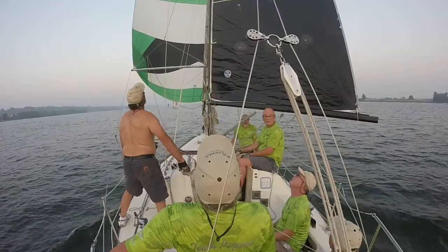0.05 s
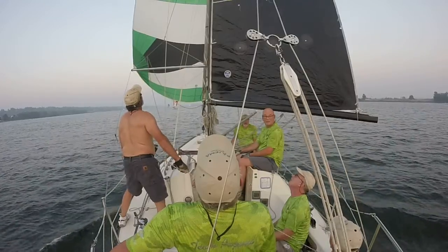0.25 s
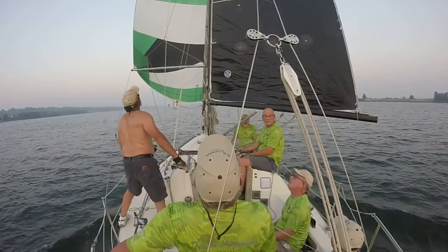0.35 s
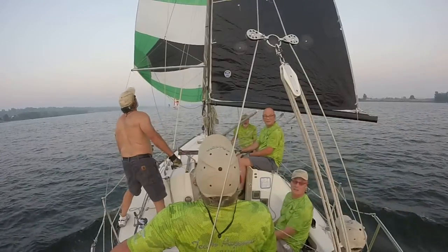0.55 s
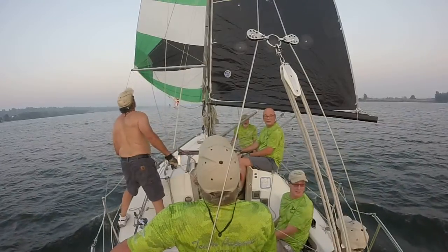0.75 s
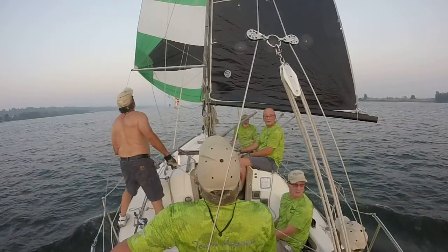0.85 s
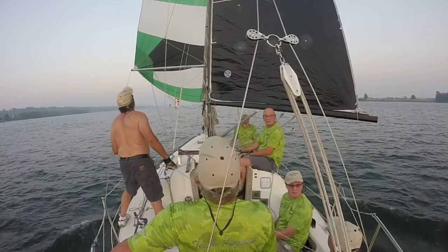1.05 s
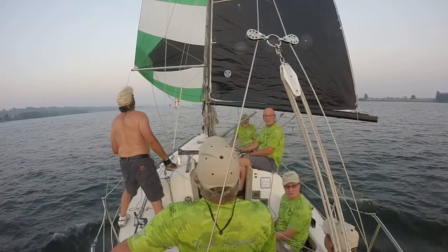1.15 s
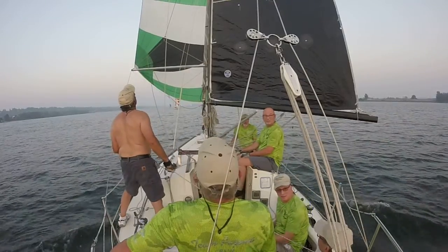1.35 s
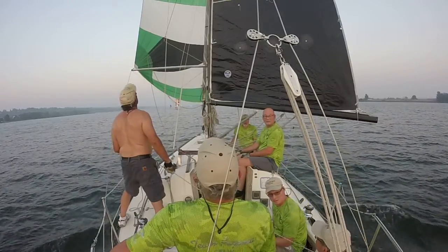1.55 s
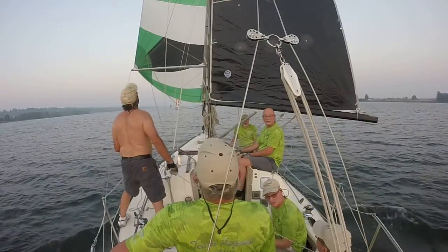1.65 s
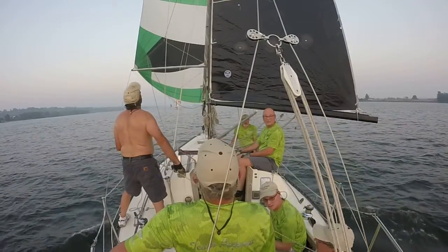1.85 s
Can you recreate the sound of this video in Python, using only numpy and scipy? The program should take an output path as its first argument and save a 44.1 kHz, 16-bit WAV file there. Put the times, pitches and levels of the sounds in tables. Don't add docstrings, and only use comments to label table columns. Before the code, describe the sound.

Sailboat line jerks through a block with a grinding rattle, then knocks loosely as water fizzes

```python
import sys
import numpy as np
from scipy import signal
from scipy.io import wavfile

SR = 44100
rng = np.random.default_rng(int(sys.argv[2]) if len(sys.argv) > 2 else 0)


def dump(signal):
    limited = np.clip(np.atleast_2d(signal).T, -1, 1)
    pcm = np.round(limited * 32767).astype(np.int16)
    wavfile.write(sys.argv[1], SR, pcm)


def convert_level_to_amplitude(level_db):
    exponent = np.asarray(level_db, float) / 20
    return 10 ** exponent


N = 83790


def rms_one(x):
    return x / np.sqrt(np.mean(x ** 2) + 1e-20)


def in_time(rows):
    seconds, *columns = np.transpose(rows)
    return [np.interp(np.arange(N) / SR, seconds, column) for column in columns]


def drift(rate):
    pole = np.exp(-80 * np.pi * rate / SR)
    noise = rng.standard_normal(N // 40 + 2002)
    slow = signal.lfilter([1], [1, -2 * pole, pole * pole], noise)[2000:]
    return np.interp(np.arange(N) / 40, np.arange(len(slow)), rms_one(slow - slow.mean()))


def resonance(x, hz, width_hz):
    r = np.exp(-np.pi * width_hz / SR)
    feedback = [1, -2 * r * np.cos(2 * np.pi * hz / SR), r * r]
    return signal.lfilter([(1 - r * r) / 2, 0, (r * r - 1) / 2], feedback, x + 1e-18)


def bright(x, low_hz, high_hz):
    return signal.sosfilt(signal.butter(2, [low_hz, high_hz], "band", fs=SR, output="sos"), x)


def body(x, modes):
    norm = np.sqrt(sum(convert_level_to_amplitude(2 * db) * np.pi * width / SR for hz, width, db in modes))
    rung = 0
    for k, (hz, width, db) in enumerate(modes):
        rung = rung + (-1) ** k * convert_level_to_amplitude(db) * resonance(x, hz, width)
    lowpass = signal.butter(6, 1.13 * modes[-1][0], fs=SR, output="sos")
    return signal.sosfilt(lowpass, rung / norm)


def grains(rate, spread_db):
    size = convert_level_to_amplitude(spread_db * np.minimum(rng.exponential(1, N), 4)) * rng.choice([-1, 1], N)
    return size * (rng.random(N) < rate / SR)


# frequency in Hz, width in Hz, level in dB.
DEEP_MODES = [(185, 96, -15), (288, 83, -14), (432, 120, -12), (530.6, 41.4, -0.5), (678, 30, -2.5)]
LOW_MODES = [(763, 82, -2.5), (936, 38, 3), (1058, 90, -1.5), (1320, 200, -3.5), (1428, 190, -6)]
MID_MODES = [(1736, 104, 3), (2290, 74, 2), (2430, 183, -7), (2610, 74, -3), (3050, 315, -9.5),
             (3853, 39, -13), (4260, 270, -36)]
HIGH_MODES = [(4890, 120, -36), (5150, 120, 9), (5440, 380, -6.5), (6000, 220, -14)]
# start in seconds, rubbing level in dB, thin ring of the fitting in dB.
HAUL_PULL = [
    (0.2, -48.5, -60.5),
    (0.34, -36.5, -46),
    (0.45, -29, -38),
    (0.65, -24.5, -36.5),
    (0.85, -27.5, -39.5),
    (0.95, -36, -47.5),
    (1.1, -57, -65),
]


def rubbing():
    low_db, ring_db = in_time([(0, -80, -90), *HAUL_PULL, (1.2, -80, -90)])
    rub = rms_one(grains(500, 1)) * convert_level_to_amplitude(-drift(41))
    fine = rms_one(grains(500, 1)) * convert_level_to_amplitude(2.2 * drift(35)) + 0.5 * rub
    thin = body(fine, MID_MODES) + convert_level_to_amplitude(-15.5) * body(fine, HIGH_MODES)
    full = body(rub, LOW_MODES) - convert_level_to_amplitude(-4) * body(rub, DEEP_MODES)
    return convert_level_to_amplitude(low_db - 0.5) * full + convert_level_to_amplitude(ring_db + 0.5) * thin


# start in seconds, peak level
# in dB, then the deep, mid and high rings in dB relative to that peak.
LINE_JOLTS = [(0.356, -17, -3, -11, -24), (0.39, -9, -9.5, -18.5, -45), (0.417, -18.5, 2, -12.5, -40),
              (0.428, -8, -7, -18.5, -28.5), (0.448, -17.5, -12, -17, -23), (0.461, -6.5, -11.5, -7, -16),
              (0.515, -31, 8, -26, -9), (0.525, -15.5, -8.5, -19, -20), (0.578, -14.5, -14.5, -14, -34),
              (0.487, -22, -9, -15, -28), (0.591, -13, -12, -24, -24), (0.609, -20, -9, -11.5, -25),
              (0.627, -30, -17, -6, -14), (0.645, -14.5, -10, -29, -31), (0.652, -23.5, -6, -27, -30),
              (0.69, -20.5, 1.5, -8.5, -23), (0.712, -18.5, -1.5, -13, -27), (0.727, -20, -1.5, -6, -25),
              (0.783, -24.5, 3, -4, -21), (0.921, -34, -11, 1, -25), (0.934, -33, -5, -2, -24),
              (0.675, -21.5, 0.5, -5.5, -27), (0.734, -14.5, -2.5, -21.5, -38), (0.739, -6, -9.5, -11, -51),
              (0.763, -16, -1.5, -8, -40), (0.8, -14, -11, -11.5, -33), (0.814, -11, -10, -6.5, -42),
              (0.838, -28, -19, -5, -8), (0.851, -15, -5.5, -11, -37), (0.866, -16.5, -2.5, -15, -29),
              (0.884, -19.5, -12, -21, -42), (0.904, -34.5, -3, 8.5, -9), (0.954, -21.5, -13.5, -9, -33),
              (0.965, -27.5, 1.5, -5.5, -21),
              (1.012, -27.5, -26, -16, -18), (1.038, -28, -26, -12, -10.5), (1.051, -41, -12, -6, -3),
                   (1.102, -28, -3, -12, -14), (1.133, -31.5, -1.5, -12, -10),
                   (1.267, -14.5, -9, -11.5, -34), (1.277, -9.5, -5, -11.5, -11),
                   (1.284, -16.5, -7.5, -8, -10), (1.297, -33, 10, -30, -12), (1.323, -35, -0.5, -8, -12),
                   (1.398, -33.5, -22, -31, -27), (1.446, -20.5, -5.5, -19, -28),
                   (1.504, -31.5, -6, -30, -24)]


def jolts():
    rows = np.array(LINE_JOLTS)
    t, out = np.arange(4000) / SR, np.zeros(N + 5000)
    rise_s, fall_s, tail_s, lead_s, deep_lag_s = 0.0006, 0.0022, 0.014, 0.0022, 0.00098
    pressing = (1 - np.exp(-t / rise_s)) * (np.exp(-t / fall_s) + convert_level_to_amplitude(-14) * np.exp(-t / tail_s))
    rough = 0.5 * pressing * rng.standard_normal((len(rows), len(t)))
    force = rough + 2.15 * (np.arange(len(t)) == 30) * np.sign(rough[:, 30:31])
    # modes, level in dB, lag in seconds, damping time in seconds
    parts = [(LOW_MODES, 0, 0, 1),
             (DEEP_MODES, rows[:, 2] + 3.5, deep_lag_s, 1),
             (MID_MODES, rows[:, 3] + 2.5, 0, 0.035),
             (HIGH_MODES, rows[:, 4] - 1.5, 0, 0.012)]
    for modes, part_db, lag_s, damp_s in parts:
        rings = body(force * np.exp(-t / damp_s), modes)
        peaks = convert_level_to_amplitude(rows[:, 1] + part_db) / np.abs(rings).max(axis=1)
        for start, peak, ring in zip(rows[:, 0], peaks, rings):
            out[int((start - lead_s + lag_s) * SR):][:len(t)] += peak * ring
    return out[:N]


# start in seconds, peak level in dB, pitch in Hz, time to decay by 60 dB in seconds.
HOLLOW_RINGS = [(0.425, -27, 513, 0.15), (0.742, -27.5, 185, 0.25), (0.746, -23, 547, 0.1),
                (0.741, -19.5, 1029, 0.038), (0.864, -35, 563, 0.07), (0.885, -19.5, 526, 0.044),
                (0.966, -33, 845, 0.11), (0.98, -26.5, 484, 0.092), (1.272, -26, 232, 0.088),
                (1.289, -27, 338, 0.065), (1.318, -30.5, 715, 0.11), (1.447, -26.5, 884, 0.065)]


def hollow():
    t, out = np.arange(N) / SR, 0
    rise_s = 0.0023
    for start, db, hz, t60 in HOLLOW_RINGS:
        age = np.maximum(t - start, 0)
        envelope = convert_level_to_amplitude(db + 6.5 - 60 * age / t60) * (1 - np.exp(-age / rise_s))
        out = out + envelope * np.sin(2 * np.pi * hz * age)
    return out


# time in seconds, level in dB, pitch in Hz.
SHEAVE_SQUEAL = [
    (0.56, -44, 2330),
    (0.6, -34.5, 2325),
    (0.622, -44, 2310),
    (0.648, -25.5, 2240),
    (0.667, -40, 2200),
    (0.685, -32, 2240),
    (0.7, -46, 2320),
]


def squeal():
    first, last = SHEAVE_SQUEAL[0], SHEAVE_SQUEAL[-1]
    before = (first[0] - 0.03, -90, first[2])
    after = (last[0] + 0.03, -90, last[2])
    db, hz = in_time([before, *SHEAVE_SQUEAL, after])
    phase = 2 * np.pi * np.cumsum(hz * (1 + 0.004 * drift(28))) / SR
    return np.sqrt(2) * convert_level_to_amplitude(db - 4.5 + 0.91 * drift(50)) * np.sin(phase)


# start in seconds, peak level in dB, pitch in Hz, tick level in dB over the peak.
DROPLETS = [(0.0795, -35.5, 4200, -31), (0.1223, -39, 6000, -25), (0.1485, -36, 5960, -27),
            (0.176, -37.5, 4500, -30), (0.316, -36, 5040, -12), (0.3578, -37, 5200, -22),
            (0.9632, -29.5, 4400, -3), (1.0898, -29, 5000, -23), (1.1478, -29, 4600, -19),
            (1.172, -32, 4650, -27), (1.235, -29, 4310, 9), (1.3229, -28, 5440, -29),
            (1.3354, -30, 4340, -31), (1.4696, -36, 4960, -21), (1.517, -35, 5130, -24),
            (1.546, -37.5, 4960, -1), (1.5548, -30, 4100, -26), (1.6324, -54, 4800, -20),
            (1.6455, -43, 6600, -25), (1.8412, -30, 4890, -37), (1.878, -32, 4730, -20)]


def droplets():
    t, splats, ticks = np.arange(900) / SR, np.zeros(N + 900), np.zeros(N + 900)
    splat_s, tick_s = 0.0016, 0.0004
    noises = rng.standard_normal((len(DROPLETS), len(t)))
    for (start, db, hz, tick_db), noise in zip(DROPLETS, noises):
        i = int(start * SR)
        splat = resonance(noise * np.exp(-t / splat_s), 0.98 * hz, hz / 4)
        splats[i:i + len(t)] += convert_level_to_amplitude(db - 2) * splat / np.abs(splat).max()
        ticks[i:i + len(t)] += convert_level_to_amplitude(db + tick_db - 14) * noise * np.exp(-t / tick_s)
    return (splats + bright(ticks, 4600, 16000))[:N]


# start in seconds, peak level in dB, pitch in Hz.
DEEP_BUBBLES = [
    (0.2333, -39, 2660),
    (1.1334, -29, 2650),
    (1.3324, -30, 2830),
    (1.34, -35, 3000),
    (1.424, -32, 2520),
    (1.525, -33, 2740),
    (1.647, -31, 2530),
    (1.828, -44, 2700),
]


def bubbles():
    out = np.zeros(N + 900)
    for start, db, hz in DEEP_BUBBLES:
        cycles = np.arange(900) / SR * hz
        tone = np.sin(2 * np.pi * cycles * (1 + 0.01 * cycles / 2))
        decay = np.exp(-np.log(1000) * cycles / 32)
        out[int(start * SR):][:900] += convert_level_to_amplitude(db) * tone * decay * (1 - np.exp(-cycles / 0.5))
    return out[:N]


# start in seconds, peak level in dB.
FOAM_SNAPS = [(0.0787, -37), (0.1221, -42), (0.1486, -50), (0.3032, -42), (0.3586, -42), (0.4579, -27),
              (0.8799, -49), (0.9448, -45), (0.9627, -36), (1.0879, -49), (1.1473, -24), (1.2037, -39),
              (1.2346, -15), (1.3229, -45), (1.3798, -43), (1.4691, -45), (1.492, -44), (1.5179, -61),
              (1.5479, -36), (1.5923, -40), (1.6367, -35), (1.6447, -42), (1.7414, -75), (1.8262, -43),
              (1.8402, -48), (1.8771, -44)]


def snaps():
    t, out = np.arange(300) / SR, np.zeros(N + 300)
    noise = rng.standard_normal((len(FOAM_SNAPS), len(t)))
    puffs = bright(noise * np.exp(-t / 0.00013), 4200, 15000)
    for (start, db), puff in zip(FOAM_SNAPS, puffs):
        out[int(start * SR):][:len(t)] += convert_level_to_amplitude(db - 19) * puff / np.abs(puff).max()
    return out[:N]


# low edge of the band in Hz, level in dB.
FOAM_TICKS = [(2300, 14), (4300, 12), (5500, -10), (8500, -12), (10000, -16)]


def spray():
    clicks = grains(1300 * convert_level_to_amplitude(3 * drift(15)), 3.2)
    dealt = rng.integers(0, 24, N)
    fizz = 0
    for k, hz in enumerate(np.geomspace(2200, 14000, 24)):
        tilt_db = -8 * np.log2(hz / 6000)
        fizz = fizz + convert_level_to_amplitude(tilt_db) * resonance(clicks * (dealt == k), hz, 2.2 * hz / 7)
    ticks_per_s = 90
    shared = grains(ticks_per_s / 2, 2.5)
    ticks = 0
    for hz, db in FOAM_TICKS:
        ticks = ticks + convert_level_to_amplitude(db) * rms_one(bright(shared + grains(ticks_per_s, 4.2), hz, 1.5 * hz))
    hiss = rms_one(bright(rng.standard_normal(N), 8000, 16000)) * convert_level_to_amplitude(1.2 * drift(25))
    return convert_level_to_amplitude(11) * rms_one(fizz) + ticks + convert_level_to_amplitude(-7) * hiss


def banded_noise(spectrum, patchy_db, rate, grit):
    hz, db = np.transpose(spectrum)
    out, together = 0, drift(rate / 3)
    white = rng.standard_normal((2, N + SR))
    specks = [rms_one(grains(260 * convert_level_to_amplitude(4 * drift(12)), 3.5)) for _ in range(3)]
    edges = 20 * 2 ** np.arange(0, 9.7, 1 / 3)
    for k, (low, high) in enumerate(zip(edges, edges[1:])):
        source = white[k % 2].copy()
        share = grit * (low > 1900)
        source[SR:] = np.sqrt(1 - share) * source[SR:] + np.sqrt(share) * specks[k // 2 % 3]
        band = bright(source, low, high)[SR:]
        level_db = np.interp(np.log(low * high) / 2, np.log(hz), db, left=-90, right=-90)
        out = out + band * convert_level_to_amplitude(level_db + patchy_db * (0.6 * together + drift(rate)))
    return rms_one(out)


# time in seconds, level in dB.
WAKE_LEVEL = [
    (0, -67.5),
    (.2, -67.5),
    (.4, -65.5),
    (.92, -65),
    (1.05, -62.5),
    (1.3, -61),
    (1.55, -64),
    (1.75, -62.5),
    (1.9, -61.5),
]
# frequency in Hz, spectrum level in dB per Hz.
WASH_SPECTRUM = [(180, -16), (300, -2), (561, -2), (860, -0.5), (1480, -20.5), (2680, -16.5), (3720, -27.5),
                 (6400, -30), (9000, -83), (11700, -64), (19800, -120)]


def wake():
    wake_db, = in_time(WAKE_LEVEL)
    wash_db = -43.5 + 3 + 0.52 * (wake_db - wake_db.mean())
    wash = convert_level_to_amplitude(wash_db) * banded_noise(WASH_SPECTRUM, patchy_db=1.8, rate=16, grit=0.6)
    return convert_level_to_amplitude(wake_db - 8) * spray() + wash


# frequency in Hz, spectrum level in dB per Hz.
WIND_SPECTRUM = [(12, -46), (20, -15), (81, 2.5), (118, -7.5), (177, -6.5), (269, -14.5), (348, -36.5),
                 (500, -10), (650, -52), (1100, -120)]


def wind():
    return convert_level_to_amplitude(-33 - 2.5) * banded_noise(WIND_SPECTRUM, patchy_db=2.0, rate=4.8, grit=0)


def hum():
    phase = 2 * np.pi * np.cumsum(87.34 * (1 + 0.0019 * drift(0.93))) / SR
    out = 0
    for multiple, db in ((1, -43), (2, -48), (3, -46.5)):
        level = np.sqrt(2) * convert_level_to_amplitude(db + 2.5 * drift(4.6))
        out = out + level * np.sin(multiple * phase + rng.uniform(0, 2 * np.pi))
    return out


def scene():
    line = rubbing() + jolts() + hollow() + squeal()
    water = droplets() + bubbles() + snaps() + wake()
    return (line + water + wind() + hum())[None]


def band_limit(x):
    return signal.sosfilt(signal.butter(12, 15460, fs=SR, output="sos"), x)


def record(dry):
    cased = dry - 0.6 * resonance(dry, 3630, 430)
    top_cut = signal.cheby2(10, 40, 14500 + 900, fs=SR, output="sos")
    mix = signal.sosfilt(top_cut, cased)
    return band_limit(mix)


dry = scene()
out = record(dry)
dump(out)
```